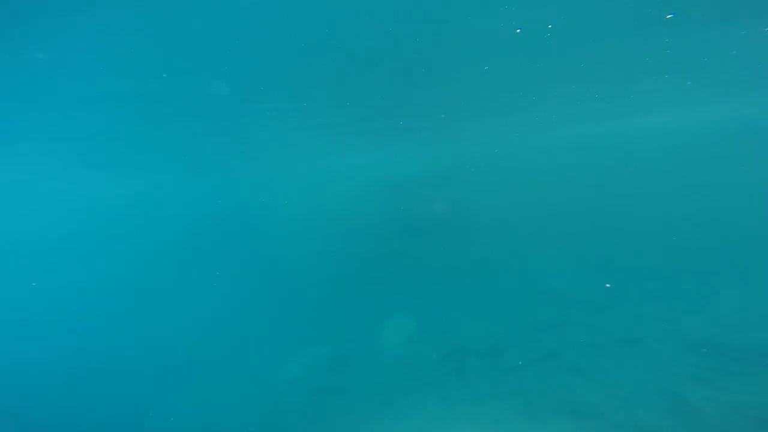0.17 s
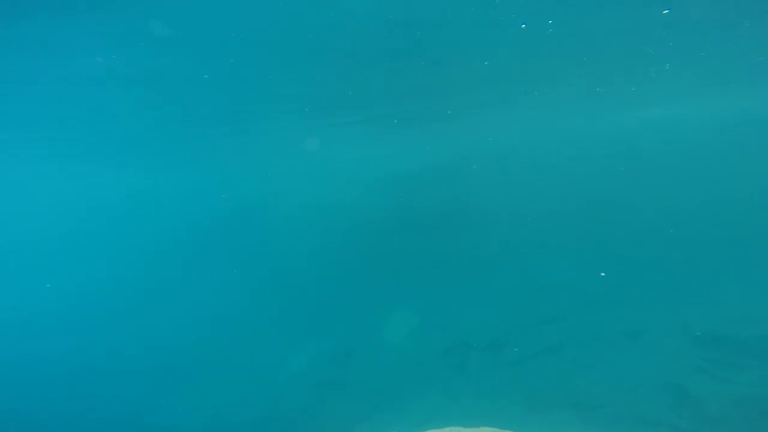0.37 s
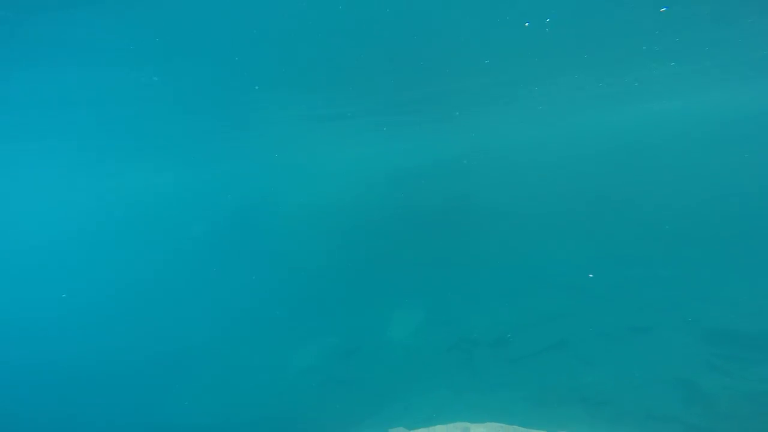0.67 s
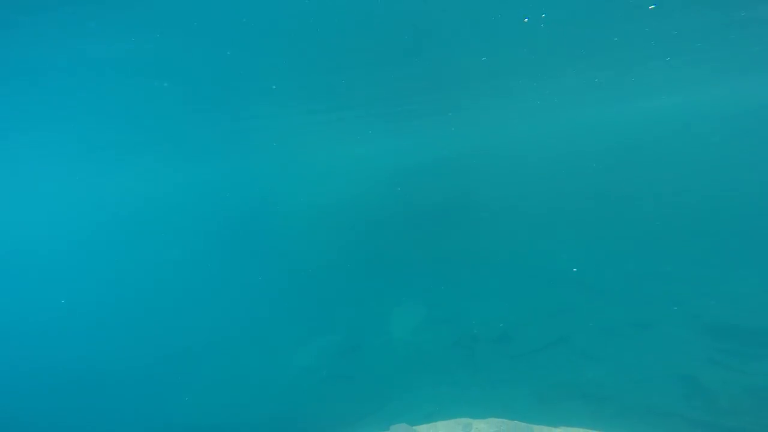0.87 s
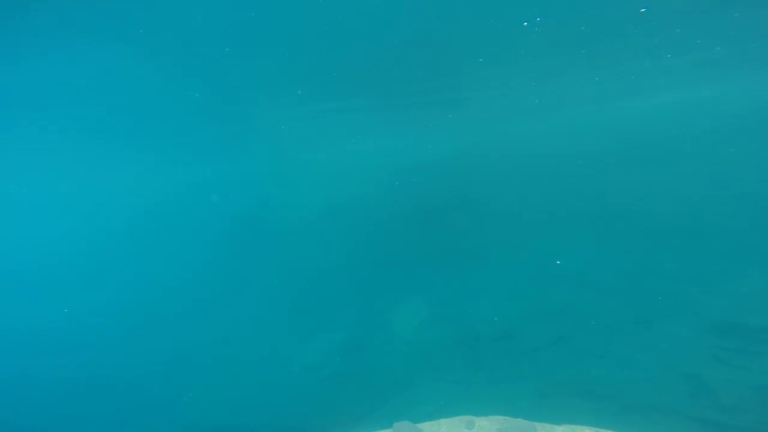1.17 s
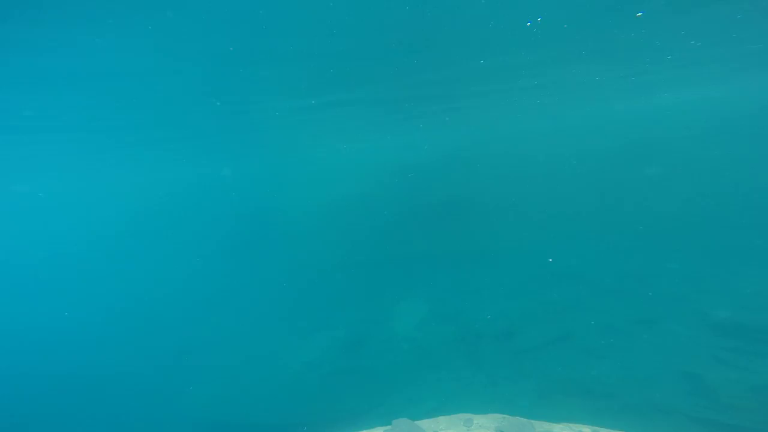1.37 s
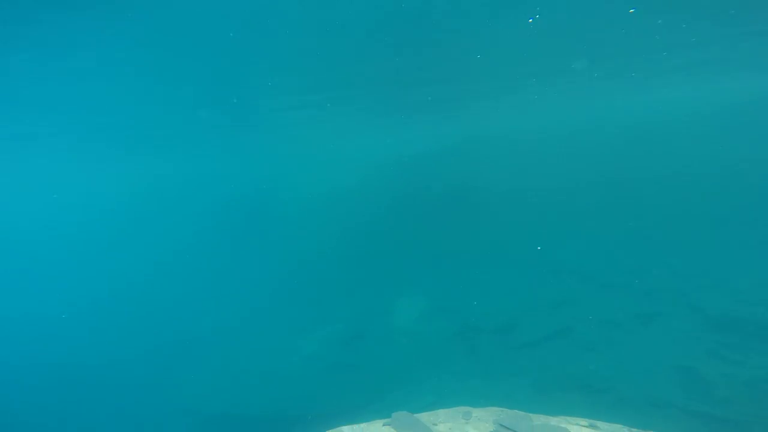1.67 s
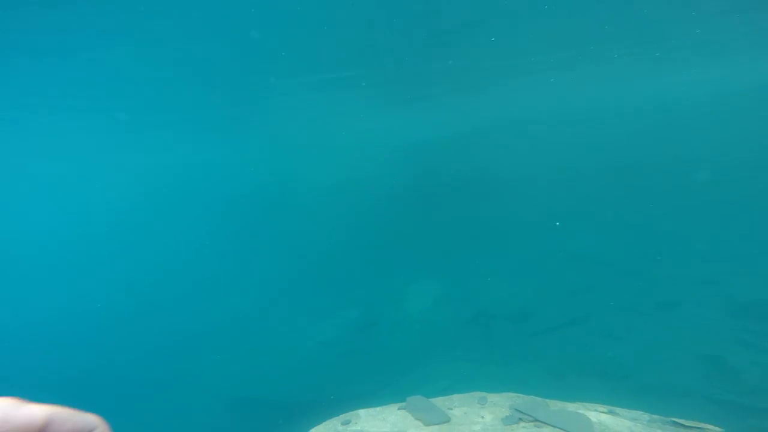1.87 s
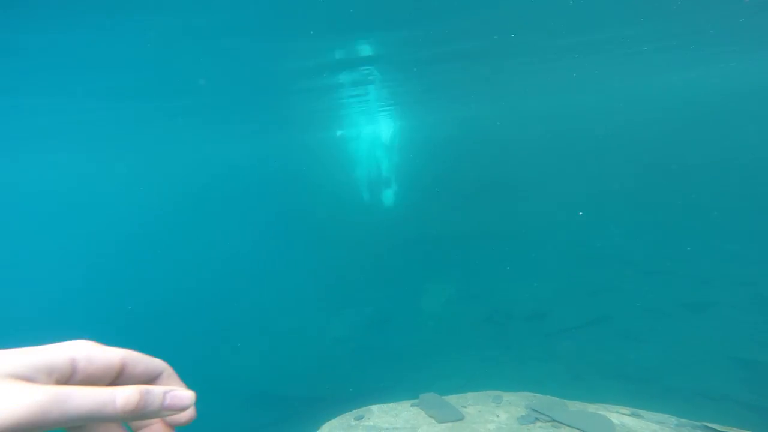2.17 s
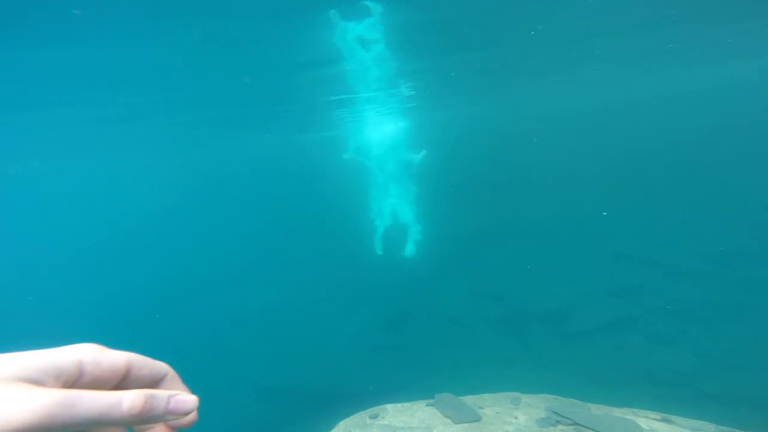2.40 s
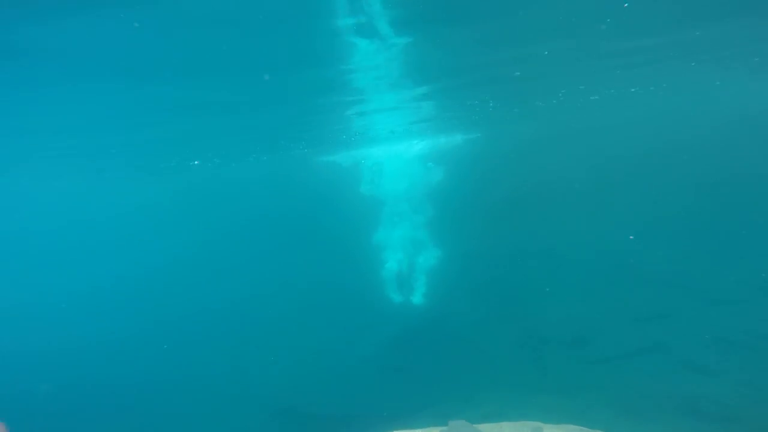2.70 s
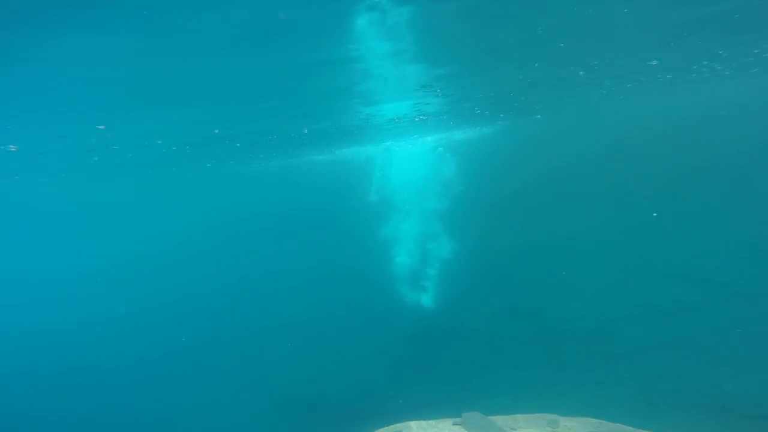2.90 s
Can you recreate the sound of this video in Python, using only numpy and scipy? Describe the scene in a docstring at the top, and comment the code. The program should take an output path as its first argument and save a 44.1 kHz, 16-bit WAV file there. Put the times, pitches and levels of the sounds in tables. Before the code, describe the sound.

A plunge heard underwater through a waterproof case. From 0 to 2.1 seconds, muffled low knocks beat in uneven strong-weak pairs like a pulse, over faint wash, thin hiss and a few tiny high ticks. At 2.1 seconds a sharp, resonant slap cracks with a quick echo; bright bubble fizz follows to the end at about 3 seconds, with deeper gurgles and single bubble blips growing from about 2.7, knocks continuing underneath.

```python
"""Muffled double knocks thud over a low wash, then a sharp slap, a bright fizz and a deep gurgle.
The place is under water in a lagoon, with the microphone inside a hand-held waterproof case.
The knocks, most likely the holder's pulse, are damped low tones. Some metres away a person plunges in:
a click rings the case resonances, tiny bubbles fizz in them as random clicks and ringing tones,
and larger bubbles gurgle up as rising tones while the cavity closes."""
import sys
import numpy as np
from scipy import signal
from scipy.fft import rfft, irfft
from scipy.io import wavfile

SR = 44100
rng = np.random.default_rng(int(sys.argv[2]) if len(sys.argv) > 2 else 0)


def wrap_up_sound(samples):
    """Save the sound to the file named by the first command line argument, as 16-bit audio."""
    columns = np.atleast_2d(samples).T
    # keep every value between -1 and 1, then stretch to whole-number steps
    tamed = np.clip(columns, -1, 1)
    steps = np.round(tamed * 32767).astype(np.int16)
    wavfile.write(sys.argv[1], SR, steps)


N = 134505  # samples, about 3 s
SLAP_S = 2.1094  # moment of the slap; fizz and gurgle are silent before it


def undb(db):
    """Decibels to gain."""
    return 10 ** (np.asarray(db) / 20)


def unit(x):
    """Scale to rms 1."""
    return x / np.sqrt(np.mean(x ** 2))


def times():
    """Time of each sample in seconds."""
    return np.arange(N) / SR


def curve(rows, axis=1):
    """Gain over time, drawn in straight dB lines between rows of (time_s, level_db, ..)."""
    rows = np.array(rows)
    return undb(np.interp(times(), rows[:, 0], rows[:, axis]))


def freqs():
    """Frequency of each spectral bin in Hz, at least 1."""
    return np.maximum(np.arange(N // 2 + 1) * SR / N, 1)


def noise(colour):
    """Noise of rms 1 whose spectrum follows rows of (freq_hz, relative level_db)."""
    hz, db = np.array(colour).T
    gain = undb(np.interp(np.log(freqs()), np.log(hz), db))
    white = rng.standard_normal(N)
    return unit(irfft(rfft(white) * gain, N))


def bump(start, hz, rise, shape, glide=0, glide_s=0.018):
    """A damped low tone that swells for `rise` seconds; with glide it starts sharp and sags to hz."""
    age = np.maximum(times() - start, 0)
    turns = hz * (age + glide * glide_s * (1 - np.exp(-age / glide_s)))
    swell = (age / rise * np.exp(1 - age / rise)) ** shape
    return swell * np.sin(2 * np.pi * turns)


def bubbles(per_s, low_hz, high_hz, cycles, glide, tilt_db, spread_db):
    """Random bubbles, each a fading tone that rises in pitch; tilt is in dB per octave."""
    out = np.zeros(N + SR)
    for when, size, strength in rng.random((int(per_s * N / SR), 3)):
        hz = low_hz * (high_hz / low_hz) ** size
        age = np.linspace(0, 1, int(cycles * SR / hz))  # share of the bubble's life
        fade = np.exp(-np.log(100) * age)
        tone = np.sin(2 * np.pi * cycles * age * (1 + glide * age)) * fade
        level_db = tilt_db * np.log2(hz / low_hz) + spread_db * strength
        first = int(when * N)
        out[first:first + len(age)] += tone * undb(level_db)
    return unit(out[:N])


# colour of the low wash round the case: freq_hz, relative level_db
WASH_COLOUR = [(12, -6.5), (24, 3), (60, -3.5), (110, -7.5), (210, -19), (380, -21.5), (700, -32),
               (1500, -54)]
# swell of the wash: time_s, level_db
WASH_LEVEL = [(0, -44.5), (.1, -47.5), (.3, -48.5), (.65, -50), (.96, -53), (1.3, -52.5), (1.7, -51.5),
              (2.0, -49), (2.6, -49), (3.05, -44)]
# colour of the slosh that settles: freq_hz, relative level_db
SLOSH_COLOUR = [(60, -23), (150, 2.5), (400, -11.5), (800, -27), (2000, -59)]
# colour of the steady hiss: freq_hz, relative level_db
HISS_COLOUR = [(100, -1.5), (500, -0.5), (1000, -2), (2000, -6.5), (4000, -11.5), (6000, -15), (8000, -20),
               (11000, -24), (14000, -32)]
# thin electronic whine, steady tones: pitch_hz, level_db (rms)
WHINE_TONES = [(5846, -82.5), (11715, -87), (14626, -83)]
SLOSH_DB, SLOSH_FADE_S, HISS_DB = -54.5, 0.41, -62


def water():
    """Coloured noises make a low wash, a decaying slosh and a hiss; sines make the electronic whine."""
    t = times()
    wash = noise(WASH_COLOUR) * curve(WASH_LEVEL)
    slosh = undb(SLOSH_DB) * noise(SLOSH_COLOUR) * np.exp(-t / SLOSH_FADE_S)
    hiss = undb(HISS_DB) * noise(HISS_COLOUR)
    whine = sum(undb(db) * np.sqrt(2) * np.sin(2 * np.pi * hz * t) for hz, db in WHINE_TONES)
    return wash + slosh + hiss + whine


# faint bright ticks near the case: start_s, level_db
TICKS = [(.622, -63), (.632, -66), (.652, -70), (.671, -64), (0.695, -64), (.707, -68), (.731, -69),
         (1.11, -68), (1.521, -67), (1.68, -70)]
# colour of the ticks: freq_hz, relative level_db
TICK_COLOUR = [(8000, -30), (9600, -7), (10100, 6), (10700, -8), (12000, -26)]
TICK_FADE_S = 0.0018


def ticks():
    """Tiny high ticks in the quiet water: bursts of narrow noise that start at once and decay."""
    t = times()
    bursts = sum(undb(db) * (t > s) * np.exp(-np.abs(t - s) / TICK_FADE_S) for s, db in TICKS)
    return noise(TICK_COLOUR) * bursts


# pulse knocks, strong and weak in turn:
# start_s, thud_pitch_hz, thud_db, knock_db, tick_pitch_hz, tick_db, scuff_db
BEATS = [(0.118, 58.8, -28.5, -33, 340, -54, -52.5), (.534, 68, -34, -47, 398, -56, -53.5),
         (.785, 58.7, -30, -33.5, 335, -51, -54), (1.156, 71.8, -36.5, -46.5, 390, -63, -57.5),
         (1.4169, 54, -30.5, -34, 352, -41, -57.5), (1.772, 63, -30.5, -41.5, 266, -38.5, -55.5),
         (2.056, 55.3, -30.5, -34.5, 328, -43.5, -54.5), (2.436, 65, -31, -48.5, 348, -51, -53.5),
         (2.695, 55, -30.5, -31.5, 325, -46, -62)]
# soft nudges of water on the case: start_s, pitch_hz, level_db
NUDGES = [(0.583, 48.4, -40), (0.669, 51.3, -43.5), (0.837, 56, -42.5), (1.212, 39, -38), (1.791, 100, -41),
          (1.841, 29.5, -37.5), (2.176, 59, -38.5), (2.616, 32, -34.5), (2.759, 43.7, -35)]
# colour of the scuff at the front of each beat: freq_hz, relative level_db
SCUFF_COLOUR = [(60, -9), (200, 0), (450, 2.5), (700, -15), (1400, -37)]
THUD_RISE_S, THUD_SHAPE, THUD_GLIDE = 0.018, 1.31, 0.15  # glide: share of pitch added at the start
KNOCK_HZ, KNOCK_RISE_S, KNOCK_SHAPE = 139.1, 0.0058, 1.0
BEAT_TICK_RISE_S, BEAT_TICK_SHAPE = 0.0021, 0.78
SCUFF_LEAD_S, SCUFF_FADE_S = 0.004, 0.02


def pulse():
    """Each beat is a deep thud with a shorter knock, tick and scuff; water nudges the case in between."""
    out, scuff, t = 0, noise(SCUFF_COLOUR), times()
    for s, hz, thud_db, knock_db, tick_hz, tick_db, scuff_db in BEATS:
        scuff_swell = np.exp(-np.abs(t - s) / np.where(t < s, SCUFF_LEAD_S, SCUFF_FADE_S))
        # the thud pushes the opposite way to the knock and tick
        out = out - undb(thud_db) * bump(s, hz, THUD_RISE_S, THUD_SHAPE, THUD_GLIDE)
        out = out + undb(knock_db) * bump(s, KNOCK_HZ, KNOCK_RISE_S, KNOCK_SHAPE)
        out = out + undb(tick_db) * bump(s, tick_hz, BEAT_TICK_RISE_S, BEAT_TICK_SHAPE)
        out = out + undb(scuff_db) * scuff * scuff_swell
    nudges = sum(undb(db) * bump(s, hz, THUD_RISE_S, THUD_SHAPE) for s, hz, db in NUDGES)
    return out - nudges


# level of the large bubbles: time_s, level_db
GURGLE_LEVEL = [(2.15, -84), (2.35, -55), (2.55, -71), (2.68, -52), (2.78, -48), (2.92, -46.5),
                (3.05, -52.5)]


def gurgle():
    """The air cavity breaks into large bubbles; the deep ones are loudest on the whole."""
    large = bubbles(per_s=650, low_hz=100, high_hz=760, cycles=7.3, glide=0.12, tilt_db=-3.5, spread_db=14)
    return large * curve(GURGLE_LEVEL) * (times() > SLAP_S)


# single bubbles that stand out of the cloud: start_s, pitch_hz, level_db (before onset and fade)
BLIPS = [(2.615, 9300, -56), (2.69, 2320, -47), (2.809, 1576, -38.5), (2.89, 2380, -44),
         (2.925, 6520, -53.5), (3.005, 1150, -44.5), (3.033, 6430, -51.5)]
BLIP_RISE_S, BLIP_FADE_S = 0.0018, 0.02  # the fade is the time to fall 30-fold
BLIP_GLIDE = 0.014


def blips():
    """Nearer bubbles ring alone for a moment, rising slightly in pitch."""
    out = 0
    for s, hz, db in BLIPS:
        age = np.clip(times() - s, 0, 2 * BLIP_FADE_S)
        envelope = (1 - np.exp(-age / BLIP_RISE_S)) * np.exp(-np.log(30) * age / BLIP_FADE_S)
        turns = hz * age * (1 + BLIP_GLIDE * age / BLIP_FADE_S)
        out = out + undb(db) * envelope * np.sin(2 * np.pi * turns)
    return out


# resonances of the case: pitch_hz, width_hz, fizz_db, slap_db (both levels relative)
CASE = [(1150, 120, -11, -10), (1516, 126, 3, 3), (1650, 140, -3, -9), (1862, 66, -2, -21),
        (2210, 132, 2, 2.5), (2306, 120, -6, 3), (2552, 130, -5, 5), (2770, 120, -8.5, -6),
        (3020, 260, -8.5, -15), (3570, 210, -9.5, -14), (4130, 250, -11, -13), (4690, 340, -13.5, -13),
        (6400, 670, -12, -16.5), (7600, 450, -9.5, -10), (9260, 1200, -17.5, -16.5),
        (11000, 1300, -28.5, -22), (13200, 920, -21, -22)]


def case_gain(axis):
    """Response of the case: its resonances add in power."""
    power = 0
    for row in CASE:
        offset = (freqs() - row[0]) / row[1]
        power = power + undb(2 * row[axis]) / (1 + 2 * offset ** 2) ** 2
    return np.sqrt(power)


def ring(x, gain):
    """Pass x through the causal, minimum-phase filter that has this gain."""
    cepstrum = irfft(np.log(gain + 1e-9), N)
    # folding the cepstrum onto positive time makes the filter ring only after its input
    cepstrum[1:N // 2] *= 2
    cepstrum[N // 2 + 1:] = 0
    return irfft(rfft(x) * np.exp(rfft(cepstrum)), N)


def pops(per_s, spread_db=2):
    """Random clicks of either sign, many small and a few large."""
    chance, size, sign = rng.random(N), rng.exponential(size=N), rng.choice([-1, 1], N)
    return (chance < per_s / SR) * sign * undb(spread_db * np.minimum(size, 5))


# bubble cloud: time_s, coarse_db (fizz below the split), fine_db (its treble)
CLOUD = [(2.13, -78, -62), (2.158, -65, -70), (2.18, -56, -60.5), (2.3, -55.5, -56.5), (2.42, -53, -58.5),
         (2.53, -51.5, -59.5), (2.63, -56.5, -63), (2.71, -52, -63), (2.83, -54, -65), (2.93, -56.5, -63),
         (3.05, -53.5, -62.5)]
FIZZ_SPLIT_HZ, FIZZ_BED_DB = 3280, -23  # the bed is a broad response under the resonances
COARSE_PER_S, FINE_PER_S = 2200, 9000
RING_SHARE = 0.14  # share of the coarse fizz's power from bubbles that ring for many cycles


def fizz():
    """Thousands of tiny bubbles click into the case and some ring on; the finest die away first."""
    gain = case_gain(axis=2) + undb(FIZZ_BED_DB) / (1 + freqs() / 6000)
    low = 1 / (1 + (freqs() / FIZZ_SPLIT_HZ) ** 12)  # power share below the split
    tones = bubbles(per_s=260, low_hz=1108, high_hz=3244, cycles=47, glide=0.03, tilt_db=3, spread_db=21)
    ringing = unit(ring(tones, gain))
    clicks = unit(ring(pops(COARSE_PER_S), gain * np.sqrt(low)))
    coarse = np.sqrt(1 - RING_SHARE) * clicks + np.sqrt(RING_SHARE) * ringing
    fine = unit(ring(pops(FINE_PER_S), gain * np.sqrt(1 - low)))
    cloud = coarse * curve(CLOUD, axis=1) + fine * curve(CLOUD, axis=2)
    return cloud * (times() > SLAP_S)


# colour of the spray as the surface tears: freq_hz, relative level_db
SPRAY_COLOUR = [(200, -6), (400, 14.5), (600, -13), (950, 1), (1500, 3.5), (2500, 6), (4000, 0.5),
                (5800, -7), (6900, -3), (7400, 7), (7800, 8), (8300, -3), (11000, -4.5), (15000, -6)]
TEAR_S = 2.104  # the surface first breaks
SPRAY_DB, SPRAY_RISE_S, SPRAY_FALL_S = -35.5, 0.0033, 0.0048
SPRAY_LEAD_S = 0.00071  # the spray peaks this long before the slap
SLAP_DB, SLAP_RING_S = -21, 0.016  # level is the peak before the echo joins
ECHO_S, ECHO_DB = 0.00465, -3.5  # the slap returns from the bed
PUSH_HZ, PUSH_RISE_S, PUSH_DB = 85, 0.002, -28.5
SCATTER_DB, SCATTER_S = -35, 0.0096


def plunge():
    """The surface tears into a slap and a push of water; the case rings, with an echo and a short scatter."""
    t = times()
    from_peak, after = t - SLAP_S + SPRAY_LEAD_S, np.maximum(t - SLAP_S, 0)
    spray_swell = np.exp(-np.abs(from_peak) / np.where(from_peak < 0, SPRAY_RISE_S, SPRAY_FALL_S))
    spray = noise(SPRAY_COLOUR) * (t > TEAR_S) * spray_swell
    gain = case_gain(axis=3)
    click = 1.0 * (np.arange(N) == int(SLAP_S * SR))
    slap = ring(click, gain) * np.exp(-after / SLAP_RING_S)
    slap = slap / np.abs(slap).max()
    slap = slap + undb(ECHO_DB) * np.roll(slap, int(ECHO_S * SR))
    push = bump(SLAP_S - PUSH_RISE_S, PUSH_HZ, PUSH_RISE_S, shape=0.73)
    scatter = unit(ring(rng.standard_normal(N), gain)) * (t > SLAP_S) * np.exp(-after / SCATTER_S)
    return undb(SPRAY_DB) * spray + undb(SLAP_DB) * slap + undb(PUSH_DB) * push + undb(SCATTER_DB) * scatter


def scene():
    """All sources, background first, at the one microphone in the case."""
    return (water() + ticks() + pulse() + gurgle() + blips() + fizz() + plunge())[None]


def record(dry):
    """The recorder cuts steeply above 15.3 kHz."""
    top_cut = signal.ellip(10, 0.2, 70, 15300, fs=SR, output="sos")
    return signal.sosfilt(top_cut, dry)


dry = scene()
out = record(dry)
wrap_up_sound(out)
```